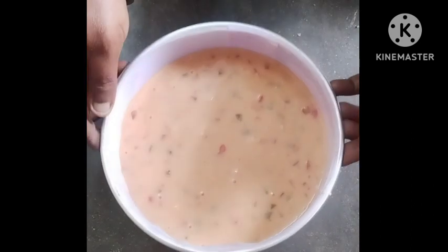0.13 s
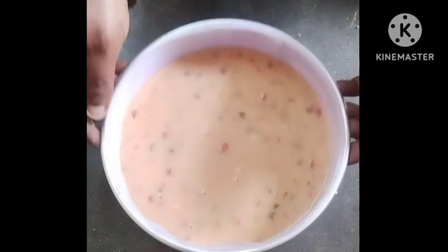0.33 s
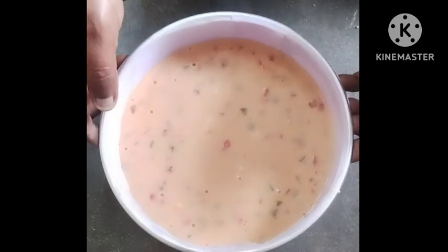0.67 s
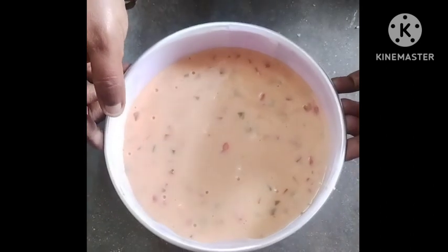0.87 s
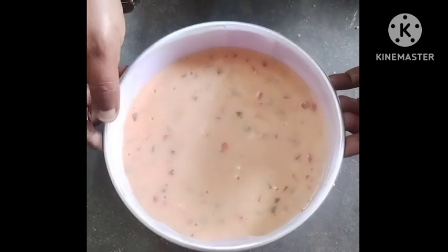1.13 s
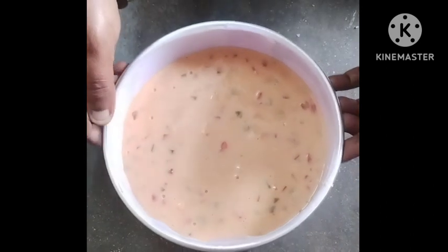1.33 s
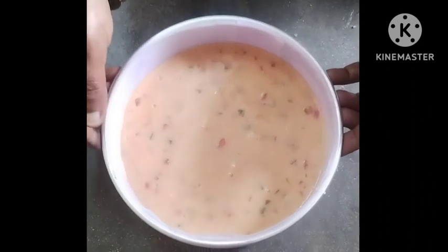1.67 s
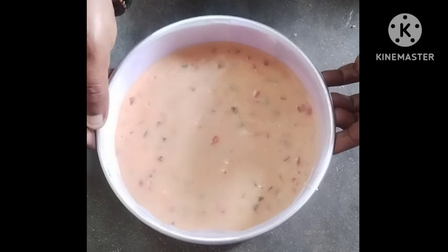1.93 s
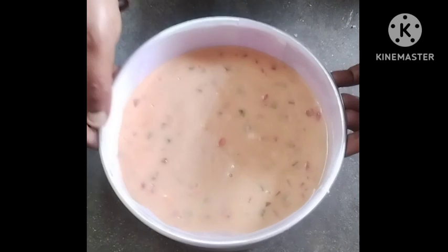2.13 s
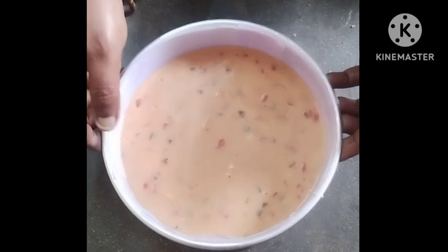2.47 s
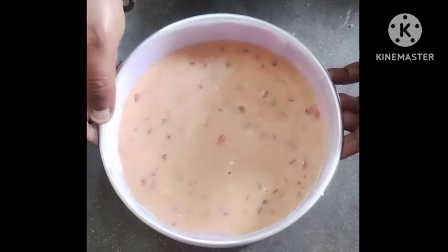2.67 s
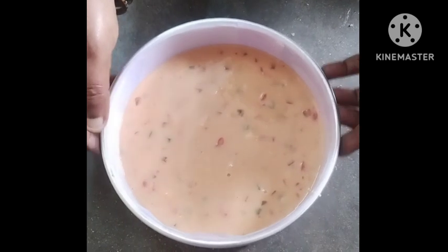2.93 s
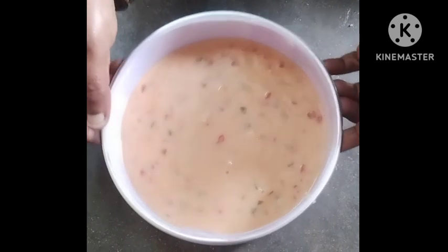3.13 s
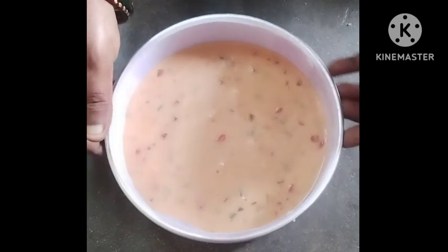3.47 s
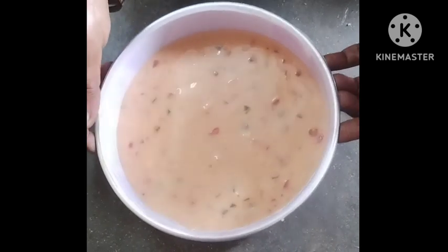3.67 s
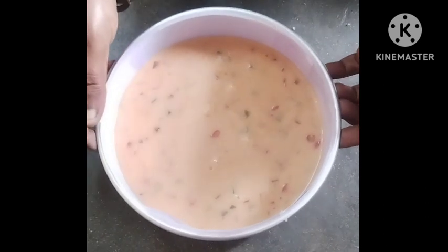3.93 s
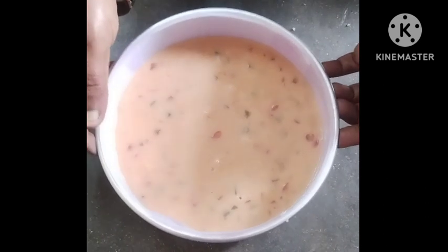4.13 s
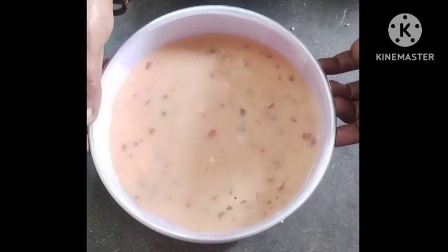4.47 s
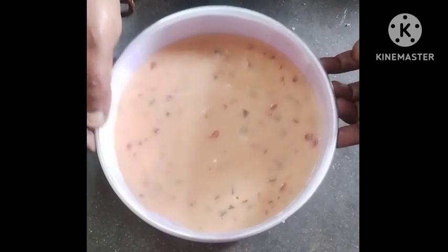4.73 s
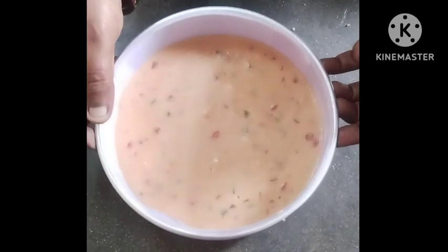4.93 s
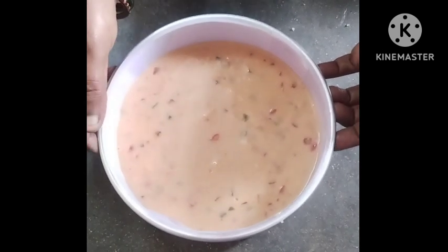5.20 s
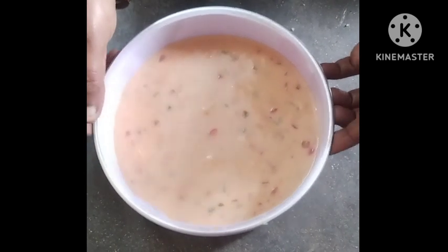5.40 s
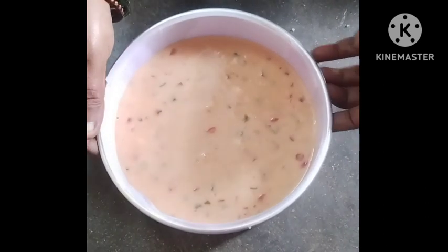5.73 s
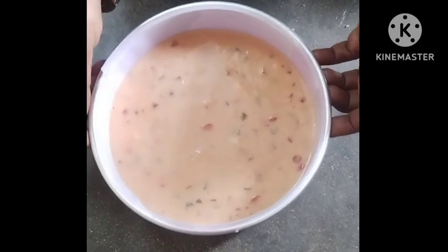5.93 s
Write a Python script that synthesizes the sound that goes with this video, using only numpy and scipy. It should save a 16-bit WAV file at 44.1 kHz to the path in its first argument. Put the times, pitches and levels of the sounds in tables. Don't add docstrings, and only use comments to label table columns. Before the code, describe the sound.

A round metal tin heavy with batter drops again and again on a stone worktop. Each drop is a quick clack-slap with a small rim rattle and low thud, its ring choked. Knocks start unevenly with pauses, then come about four a second before slowing. A small tiled kitchen answers briefly; faint traffic and tiny bangle ticks lie far below. Close stereo microphone, thin in the bass.

```python
import sys
import numpy as np
from scipy import signal
from scipy.fft import rfft, irfft, next_fast_len
from scipy.io import wavfile
from scipy.ndimage import uniform_filter1d, map_coordinates

SR = 44100
rng = np.random.default_rng(int(sys.argv[2]) if len(sys.argv) > 2 else 0)


def wav_record(signal):
    frames = np.transpose(np.atleast_2d(signal))
    bounded = np.clip(frames, -1, 1)
    quanta = np.round(bounded * 32767).astype(np.int16)
    wavfile.write(sys.argv[1], SR, quanta)


def ratio(d):
    e = np.asarray(d, float) / 20
    return 10 ** e


N = 268172
LENGTH, LEAD = 4096, 512
SIDES = np.array([[0.5], [-0.5]])


def unit(x):
    return x / np.sqrt(np.mean(x ** 2) + 1e-20)


def peak(x):
    return x / np.abs(x).max(axis=-1, keepdims=True)


def along(points, hz):
    f, v = np.transpose(points)
    return np.interp(np.log(hz + 1), np.log(f + 1), v)


def filtered(x, response):
    n = next_fast_len(x.shape[-1], real=True)
    hz = np.fft.rfftfreq(n, 1 / SR)
    return irfft(rfft(x, n) * response(hz), n)[..., :x.shape[-1]]


def high_pass(hz, corner_hz):
    return (1j * hz / (corner_hz + 1j * hz)) ** 2


def wobble(rate_hz):
    knots = rng.standard_normal(int(N * rate_hz / SR) + 4)
    return map_coordinates(knots, [np.arange(N) * rate_hz / SR])


# pitch_hz, likeness [0..1]
LIKENESS = [(60, 0.92), (130, 0.99), (290, 0.91), (640, 0.46), (1410, 0), (3100, 0), (6820, 0.032),
            (15000, 0.00058)]


def diffuse(pair, spectrum):
    def mix(hz):
        turn_rad = np.arccos(np.clip(along(LIKENESS, hz), -1, 1)) / 2
        return ratio(along(spectrum, hz)) * [np.cos(turn_rad), np.sin(turn_rad)]
    mid, side = filtered(pair, mix)
    return np.array([mid + side, mid - side])


def rush(spectrum, patchy_db):
    z = signal.stft(rng.standard_normal((2, N)), nperseg=512)[2]
    field = uniform_filter1d(rng.standard_normal(z.shape[1:]), size=3, axis=0)
    field = uniform_filter1d(field, size=14, axis=1)
    noise = signal.istft(z * ratio(patchy_db * unit(field)), nperseg=512)[1][:, :N]
    return unit(diffuse(noise, spectrum))


def spells(rows):
    swell_db_per_s, fade_db_per_s = 112, 31.5
    start_s, hold_s, level_db = np.transpose(rows)[..., None]
    t = np.arange(N) / SR
    swell_db = swell_db_per_s * np.clip(start_s - t, 0, None)
    fade_db = fade_db_per_s * np.clip(t - start_s - hold_s, 0, None)
    return ratio(level_db - swell_db - fade_db).sum(axis=0)


# start_s, level_db
TRAFFIC_STRENGTH = [(0, 1), (.4, 0.5), (1.4, 7.5), (1.6, -1), (3.2, -1), (5.4, -1), (6.1, -1.5)]
# pitch_hz, level_db [dB per Hz]
RUMBLE_COLOUR = [(24, -20.5), (50, -15), (91, -6.5), (108, 8.5), (145, -6.5), (182, -4), (300, -19),
                 (390, -41.5), (660, -120)]
WASH_COLOUR = [(180, -54), (300, -10.5), (437, -13.5), (490, -7.5), (525, -7), (1040, -19), (1300, -18),
               (1840, -27), (2140, -28), (3000, -30), (3900, -76.5), (6600, -120)]
HISS_COLOUR = [(1760, -54.5), (3000, -8.5), (3330, -5), (4730, -11.5), (5840, -12), (11500, -15),
               (15300, -20.5), (15700, -38.5)]
WHINE_COLOUR = [(1850, -25.5), (2020, -6), (2120, -3), (2220, -4.5), (2420, -41.5)]
# start_s, hold_s, level_db
WHINE_SPELLS = [(1.47, 0.21, -75), (2.08, .15, -71), (2.6, 3, -82.5)]
HORN_SPELLS = [(0.0071, 0.94, -84)]
MOTOR_SPELLS = [(1.55, 0.75, -67.5), (3.6, 0.29, -69.5), (4.2, 1.34, -72)]
# multiple [of horn_hz], level_db
HORN_PARTIALS = [(3, -3.5), (8, -3.5), (9, -4.5), (10, -5)]


def horn():
    horn_hz, t = 418, np.arange(N) / SR

    def partial(multiple, level_db):
        phase = 2 * np.pi * multiple * horn_hz * t + 0.4 * wobble(6)
        return ratio(level_db + 4.1 * wobble(22)) * np.sin(phase)
    return np.array([sum(partial(*row) for row in HORN_PARTIALS) for port in "LR"])


def motor():
    motor_hz, t = 491, np.arange(N) / SR
    return np.array([ratio(3 * wobble(32)) * np.sin(2 * np.pi * motor_hz * t + 0.5 * wobble(41))
                     for port in "LR"])


def street():
    rumble_db, wash_db, hiss_db = -62, -68.5, -80
    hiss_share, hiss_fade_db_per_s = 0.38, 0.7
    t = np.arange(N) / SR
    traffic_db = np.interp(t, *np.transpose(TRAFFIC_STRENGTH))
    out = ratio(rumble_db + traffic_db) * rush(RUMBLE_COLOUR, patchy_db=1.6)
    out += ratio(wash_db + traffic_db) * rush(WASH_COLOUR, patchy_db=1.5)
    out += spells(WHINE_SPELLS) * rush(WHINE_COLOUR, patchy_db=1.2)
    hiss_level_db = hiss_db + hiss_share * traffic_db - hiss_fade_db_per_s * t
    out += ratio(hiss_level_db) * rush(HISS_COLOUR, patchy_db=1.5)
    return out + spells(HORN_SPELLS) * horn() + spells(MOTOR_SPELLS) * motor()


# start_s, peak_db, crisp_db, hard_db [dB per octave], weight_db [batter behind it]
EDGE_LANDINGS = [(.377, -5.5, 9, 13, -5.5), (0.7811, -9, 2, -3, -6), (1.1053, -19.5, -5.5, -9.5, -3.5),
                 (1.8456, -12.5, -2.5, -2.5, -0.5), (2.2058, -9.5, 8.5, 15, -4.5),
                 (2.4982, -10.5, 2.5, 9, 8), (2.7511, -24.5, 2.5, -1, 5.5), (3.257, -27, -1.5, -9.5, 4),
                 (3.3012, -8.5, 6.5, 2, 3), (3.7723, -14.5, 0, -6, 3.5), (4.0257, -8, 9.5, -5.5, 0.5),
                 (4.3025, -8.5, -2.5, 1, -2), (4.5598, -5.5, 4, -1, 1), (4.794, -7, 2, -1, -2.5),
                 (5.032, -4, 13, 8.5, 2), (5.5377, -10.5, -3.5, -2, 1.5), (6.0352, -16.5, 0, -9, 2.5)]
# start_s, peak_db, crisp_db, hard_db [dB per octave]
FAR_SLAPS = [(0.3931, -13, 1, 13), (0.7939, -8, 3.5, 14), (1.1154, -21.5, 6, -13), (1.8634, -16.5, 11.5, 0),
             (2.2234, -11.5, 0.5, -7), (2.5137, -29, -3, 0), (2.755, -13.5, 2.5, -7),
             (3.3135, -25.5, -6.5, 1), (3.7867, -9.5, -1.5, 1), (4.0356, -12, 5.5, -3),
             (4.3167, -14, -3, 0.5), (4.576, -16, 3, 15), (4.8053, -6, -2.5, 10), (5.0404, -13.5, -4, 4),
             (5.542, -8, 2, -5), (6.0407, -10, 3.5, -4.5)]
# start_s, peak_db
RIM_ROCKS = [(0.3899, -15.5), (.4, -24.5), (0.7828, -17), (0.7946, -11), (1.112, -21.5), (1.856, -35.5),
             (1.858, -16), (1.8862, -22), (1.8968, -18.5), (2.218, -20), (2.5, -25.5), (3.784, -13),
             (4.0399, -18), (4.3229, -14.5), (4.335, -24), (4.5724, -19.5), (4.7946, -17.5),
             (4.8029, -14.5), (6.044, -12)]
# click_db, thud_db, room_db
CONTACT_KINDS = [
    (-24, -8, 2),
    (-21, -4, 2),
    (-18.5, -3, -5),
]


def contacts():
    room_per_weight = 0.18
    drop_s, *_, weight_db = np.transpose(EDGE_LANDINGS)
    rows = []
    for table, kind in zip((EDGE_LANDINGS, FAR_SLAPS, RIM_ROCKS), CONTACT_KINDS):
        rows += [(*row, 0, 0)[:4] + tuple(kind) for row in table]
    start_s, peak_db, crisp_db, hard_db, click_db, thud_db, room_db = np.transpose(sorted(rows))
    drop = np.searchsorted(drop_s, start_s, side="right") - 1
    heavy_db = weight_db[np.clip(drop, 0, None)]
    return np.array([start_s, peak_db, click_db + crisp_db, thud_db + heavy_db,
                     room_db + room_per_weight * heavy_db, hard_db])


def rings(modes, count, scatter_db, detune, length=LENGTH, attack_s=1e-4, tilt_db=0):
    hz, level_db, t60_s = np.transpose(modes)[..., None]
    t = np.arange(length) / SR
    chance = rng.standard_normal((count, 2, len(modes), 1))
    level_db = level_db + scatter_db * chance[:, 1] + tilt_db * np.log2(hz / 1000)
    waves = np.sin(2 * np.pi * hz * (1 + detune * chance[:, 0]) * t) * ratio(level_db - 60 * t / t60_s)
    return waves.sum(axis=1) * (1 - np.exp(-t / attack_s))


def add(track, bursts, times_s, lead):
    for burst, s in zip(bursts, times_s):
        part = track[..., round(s * SR) - lead:][..., :burst.shape[-1]]
        part += burst[..., :part.shape[-1]]
    return track


# pitch_hz, level_db, t60_s
TIN_MODES = [(607, 2, 0.0077), (967, 6, 0.011), (1329, 15, 0.0038), (1544, 9, 0.0031), (1820, -10, 0.045),
             (2360, -25.5, 0.019)]
# pitch_hz, level_db, t60_s
SLAB_MODES = [(150.1, 0, 0.044), (234.5, 11.5, 0.023), (365.6, -12.5, 0.018)]
# pitch_hz, level_db
CLICK_COLOUR = [(2000, -8), (3600, 4), (5200, 0), (7100, 3), (9500, -0.5), (12000, -4), (15300, -10),
                (16300, -32.5)]
# pitch_hz, level_db
SWELL_COLOUR = [(200, -29.5), (600, -9.5), (1500, -3), (3000, -11.5), (12000, -61)]


def tin():
    _, peak_db, click_db, thud_db, _, hard_db = contacts()[..., None]
    count, t = len(peak_db), np.arange(LENGTH) / SR

    grit = 0.13 * rng.standard_normal((count, LENGTH)) * ratio(-60 * t / 0.016)
    grit = grit + (t == t[28])
    click = peak(filtered(grit, lambda hz: ratio(along(CLICK_COLOUR, hz))))

    knock = rings(TIN_MODES, count, scatter_db=1.5, detune=0.03, attack_s=0.0004,
                  tilt_db=hard_db[..., None])
    knock = peak(filtered(knock, lambda hz: high_pass(hz, corner_hz=270) / (1 + 1j * hz / 3000) ** 2))
    thud = peak(rings(SLAB_MODES, count, scatter_db=1.5, detune=0.03, attack_s=0.004))

    def spread(hz):
        delay_s = 0.0003 + 0.0015 * hz / 16000
        return np.exp(2j * np.pi * SR / LENGTH * np.cumsum(delay_s))
    sharp = filtered(np.roll(knock + ratio(click_db + 9) * click, LEAD, axis=1), spread)

    swell = filtered(rng.standard_normal((count, LENGTH)), lambda hz: ratio(along(SWELL_COLOUR, hz)))
    sharp += ratio(-24) * unit(swell) * ratio(-60 * np.abs(t - LEAD / SR) / 0.015)
    return ratio(peak_db) * sharp, ratio(peak_db + thud_db) * np.roll(thud, LEAD, axis=1)


# pitch_hz, left_minus_right_db
PORT_TILT = [(100, 3.5), (500, -8), (800, 12.5), (1300, 2.5), (2400, 4.5), (4400, -1), (8000, -3.5),
             (15000, -4)]
# delay_s, left_gain, right_gain
FIRST_ECHOES = [(.0021, 0.04, -0.51), (.0036, 0.16, -0.069), (.0048, 0.12, -0.043), (.0075, -.2, .25),
                (0.012, 0.13, -0.38)]


def ports(hz):
    lead_rad = 1.62
    echoes = sum(np.array([[left], [right]]) * np.exp(-2j * np.pi * hz * delay_s)
                 for delay_s, left, right in FIRST_ECHOES)
    phase = lead_rad * np.tanh(hz / 3000) * np.array([[1], [0]])
    direct = ratio(SIDES * along(PORT_TILT, hz)) * np.exp(1j * phase)
    return direct + echoes * high_pass(hz, corner_hz=243) / (1 + 1j * hz / 2500)


def radiated(blows, click_db):
    beaming = 0.45
    power = np.abs(rfft(blows)) ** 2
    treble = 1 / (1 + (2600 / (np.fft.rfftfreq(LENGTH, 1 / SR) + 1)) ** 8)
    missed = ratio(-2 * beaming * (click_db - click_db.mean()))[:, None]
    low = (1 - treble) * uniform_filter1d(power, size=25, axis=-1)
    high = missed * treble * uniform_filter1d(power, size=121, axis=-1)
    return np.roll(irfft(np.sqrt(np.abs(low + high))), LEAD, axis=-1)


# pitch_hz, t60_s
KITCHEN_DECAY = [(60, 0.98), (160, 0.57), (420, 0.47), (1100, 0.36), (2900, 0.49), (5000, 0.42),
                 (9000, 0.31), (15000, 0.34)]
# pitch_hz, level_db
WALL_COLOUR = [(60, -5.5), (250, -10.5), (370, 2.5), (600, 6.5), (1000, -2.5), (1600, -7.5), (2700, -7),
               (4000, -12), (9000, -12), (15000, -8.5)]


def tail():
    length, gap = 28000, 260
    near_db, near_t60_s = 0, 0.083
    room_shadow, room_top_hz = 0.13, 15400
    hz, t, z = signal.stft(rng.standard_normal((2, length)), SR, nperseg=512)
    far = ratio(-60 * t / along(KITCHEN_DECAY, hz)[:, None])
    near = ratio(near_db - 60 * t / near_t60_s)
    pair = signal.istft(z * (far + near), SR, nperseg=512)[1][:, :length]
    pair = pair * (1 - np.exp(-np.arange(length) / SR / 0.0055))
    pair = np.pad(pair / np.linalg.norm(pair[0]), ((0, 0), (gap, 0)))

    def shadow(hz):
        return ratio(room_shadow * SIDES * along(PORT_TILT, hz)) / (1 + (hz / room_top_hz) ** 60)
    return filtered(diffuse(pair, WALL_COLOUR), shadow)


# pitch_hz, level_db, t60_s
ROOM_MODES = [(71.9, 0.5, 0.6), (140.75, -7, 1), (190.6, -2, 0.4), (239.8, 4, 0.25), (268.4, -4, 0.18),
              (421, -4, 0.3), (496.8, -6.5, 0.5), (507.6, -4.5, 0.35), (538, -1, 0.44), (603, -3.5, 0.35),
              (777, -7, 0.34), (926, -13, 0.1), (954, -8, .3), (1077, -10, 0.19)]


def standing_waves():
    turn_rad = 0.6
    start_s, peak_db, _, thud_db, room_db, _ = contacts()
    boom = rings(ROOM_MODES, len(start_s), scatter_db=1.5, detune=0.0024, length=17000, attack_s=0.034,
                 tilt_db=(room_db - thud_db)[:, None, None] / 3)
    fade = np.cos(np.linspace(0, np.pi / 2, boom.shape[1]) ** 2 * 2 / np.pi)
    level = ratio(peak_db + room_db - 22)[:, None]
    waves = add(np.zeros(N), level * boom * fade, start_s, 0)
    return filtered(waves, lambda hz: np.exp(2j * turn_rad * SIDES / (1 + (350 / (hz + 1)) ** 4)))


def knocks():
    start_s, _, click_db, _, room_db, _ = contacts()
    sharp, thud = tin()
    direct = filtered((sharp + ratio(-11.5) * thud)[:, None], ports)
    out = add(np.zeros((2, N)), direct * ratio(-2.5), start_s, LEAD)
    blows = radiated(sharp, click_db) * ratio(room_db)[:, None] + ratio(-2.5) * thud
    drop = np.cumsum(np.diff(start_s, prepend=0) > 0.1)
    same = tail()
    for k in np.unique(drop):
        first_s = start_s[drop == k][0]
        sent = add(np.zeros(3 * LENGTH), blows[drop == k], start_s[drop == k] - first_s, 0)
        reply = 0.71 * same + 0.55 * tail()
        add(out, [signal.fftconvolve(sent[None], reply, axes=1)], [first_s], LEAD)
    return out + standing_waves()


# start_s, peak_db, bright_db
BANGLE_TICKS = [(1.3194, -81, 5.5), (1.38, -79, -4), (1.3994, -78, 13), (1.4204, -81, -6.5),
                (1.434, -85, 3), (1.6094, -78, 7), (1.694, -80, 0), (1.7135, -71, 7), (2.8494, -67, -6),
                (3.4694, -77, -8), (3.549, -83, 17), (4.8928, -62, 9), (5.139, -57, 0), (5.8247, -76, 12.5)]
# pitch_hz, level_db, t60_s
BANGLE_MODES = [(5850, -6, 0.014), (9200, -5, 0.016), (11100, -2, 0.018)]


def bangles():
    start_s, peak_db, bright_db = np.transpose(BANGLE_TICKS)
    count, t = len(start_s), np.arange(LENGTH) / SR
    noise = rng.standard_normal((count, 2, LENGTH))
    dust = unit(filtered(noise, lambda hz: ratio(along(CLICK_COLOUR, hz))))
    dust = dust * ratio(-60 * t / 0.025) * (1 - np.exp(-t / 0.0024))
    ring = rings(BANGLE_MODES, count, scatter_db=3, detune=0.008, attack_s=0.0013)[:, None]
    tick = ring + ratio(bright_db - 1.5)[:, None, None] * dust
    return add(np.zeros((2, N)), ratio(peak_db + 4.5)[:, None, None] * tick, start_s, 0)


def scene():
    return street() - knocks() + bangles()


def band_limit(x):
    return signal.sosfilt(signal.butter(12, 16520, fs=SR, output="sos"), x)


def record(dry):
    padded = np.pad(dry, ((0, 0), (0, LENGTH)))
    heard = filtered(padded, lambda hz: high_pass(hz, corner_hz=75.6) ** 2.19)[:, :N]
    heard = heard / (1 + np.abs(heard / 0.55) ** 4) ** (1 / 4)
    return band_limit(heard)


dry = scene()
out = record(dry)
wav_record(out)
```